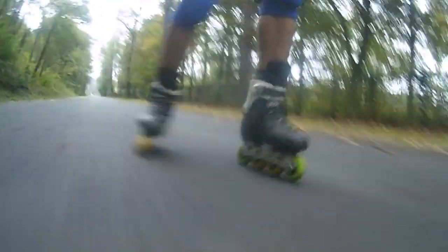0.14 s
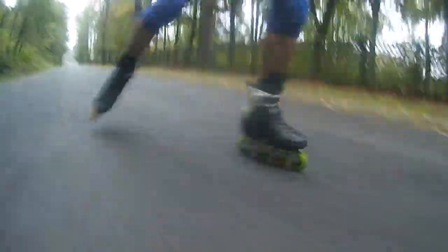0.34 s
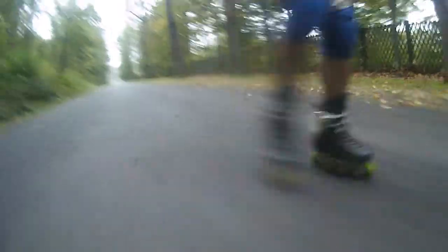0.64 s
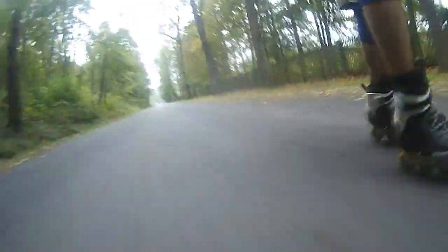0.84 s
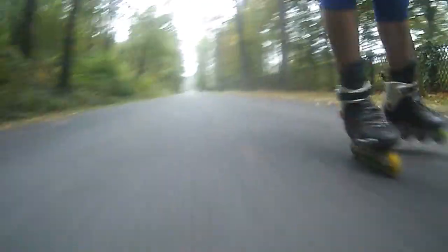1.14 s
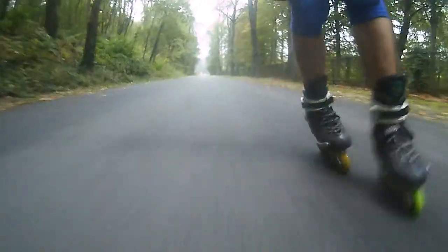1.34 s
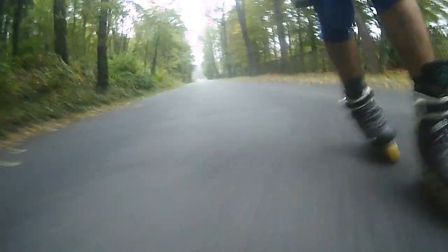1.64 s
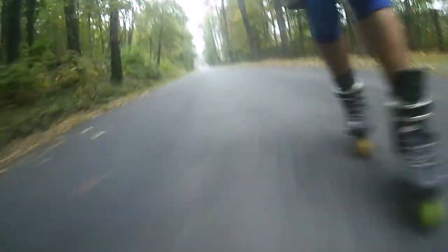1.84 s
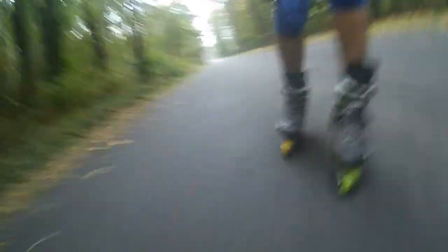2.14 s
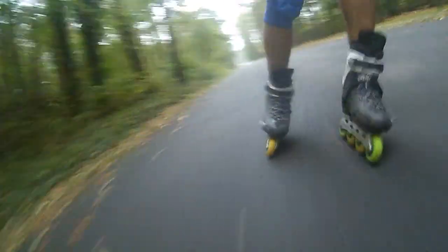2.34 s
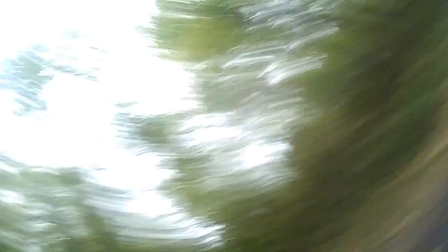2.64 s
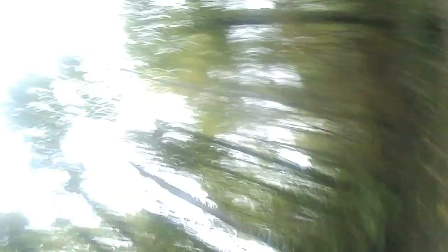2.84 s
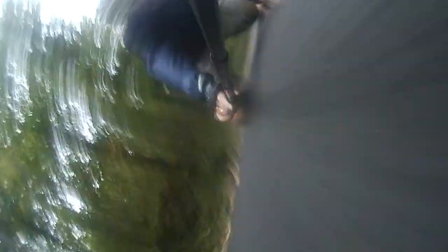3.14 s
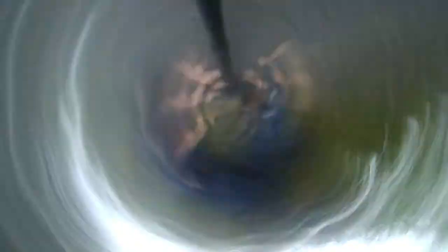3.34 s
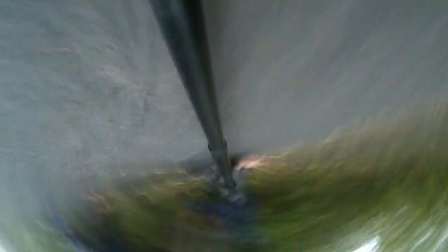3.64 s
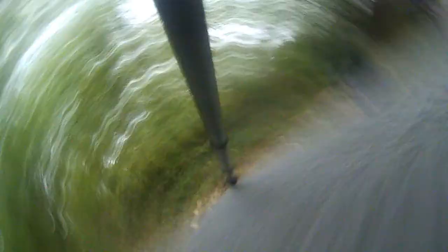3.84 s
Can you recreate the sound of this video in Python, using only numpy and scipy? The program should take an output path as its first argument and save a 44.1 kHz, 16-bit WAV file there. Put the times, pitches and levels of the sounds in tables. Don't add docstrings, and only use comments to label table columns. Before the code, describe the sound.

Heard from inside a sealed camera case on a pole: soft grainy skate rolling over faint hiss, a sharp tick midway, then a sudden burst of cracks, deep thuds and plastic chatter against asphalt, cut off abruptly.

```python
import sys
import numpy as np
from scipy import signal
from scipy.fft import rfft, irfft, next_fast_len
from scipy.io import wavfile
from scipy.ndimage import uniform_filter1d, map_coordinates

SR = 44100
rng = np.random.default_rng(int(sys.argv[2]) if len(sys.argv) > 2 else 0)


def unload_audio(sound):
    columns = np.transpose(np.atleast_2d(sound))
    steps = np.round(np.clip(columns, -1, 1) * 32767)
    wavfile.write(sys.argv[1], SR, steps.astype(np.int16))


def gain_from_db(level_db):
    decades = np.asarray(level_db, float) / 20
    return 10 ** decades


N = 176400


def unit(x):
    return x / np.sqrt(np.mean(x ** 2) + 1e-20)


def curve(rows):
    return np.interp(np.arange(N) / SR, *np.transpose(rows))


def wobble(rate_hz):
    knots = rng.standard_normal(int(N * rate_hz / SR) + 4)
    return map_coordinates(knots, [np.arange(N) * rate_hz / SR])


def filtered(x, response):
    m = next_fast_len(N + SR // 2)
    return irfft(rfft(x, m) * response(np.fft.rfftfreq(m, 1 / SR)), m)[:N]


def noise(response):
    return unit(filtered(rng.standard_normal(N), response))


def colour(points):
    hz_points, db = np.transpose(points)
    return lambda hz: gain_from_db(np.interp(np.log(hz + 1), np.log(hz_points + 1), db))


def resonance(f, hz, width_hz):
    return 1j * f * width_hz / (hz * hz - f * f + 1j * f * width_hz)


def add(track, time_s, x):
    i = round(time_s * SR)
    track[i:i + len(x)] += x[:max(len(track) - i, 0)]


def push(contact_s):
    u = np.arange(int(contact_s * 8 * SR) + 4) / (contact_s * SR / 2 + 1)
    return u * np.exp(1 - u)


def through(force, body):
    wall_hz = 3920

    def response(f):
        wall = 1 / (1 + 1.1j * f / wall_hz - (f / wall_hz) ** 2) ** 4
        return wall * sum(gain_from_db(db) * resonance(f, hz, width_hz) for hz, width_hz, db in body)

    return filtered(force, response)


# (frequency [Hz], width [Hz], level [dB])
HOUSING_MODES = [(103.2, 45.6, 2.5), (226, 106, -6.5), (495, 570, -8), (762, 14, -18), (1079, 267, -0.5),
                 (1300, 220, -44), (1690, 71, -11.5), (2380, 160, -12), (2730, 60, -16), (3674, 330, -10.5),
                 (4300, 290, -26), (5530, 2600, -12.5)]


def housing(force):
    return through(force, HOUSING_MODES)


# (time [s], level [dB])
ROLLING = [(0.0, -64.5), (0.19, -69), (0.41, -68.5), (0.63, -64), (.9, -66), (1.16, -64.5), (1.35, -66),
           (1.57, -68.5), (2.2, -65.5), (2.44, -64), (2.7, -65), (3.15, -67), (3.44, -62.5), (3.63, -55.5),
           (3.72, -60), (4.0, -56.5)]
# (frequency [Hz], level [dB per Hz])
ROAD_GRAIN = [(60, -59.5), (100, 11), (200, 4.5), (600, 11.5), (1200, 6), (2500, -6.5), (4000, -2),
              (7000, 10)]


def wheels():
    grains_per_s, grain_db = 1500, 1.5
    bearing_hz, bearing_width_hz, bearing_db = 2960, 330, -17
    struck = rng.random(N) < grains_per_s / SR
    size = gain_from_db(grain_db * (4.5 + rng.exponential(size=N)))
    grains = rng.standard_normal(N) * (1 + struck * size)
    hum = unit(housing(filtered(grains, colour(ROAD_GRAIN))))
    bearings = unit(filtered(grains[::-1], lambda f: resonance(f, bearing_hz, bearing_width_hz) ** 2))
    flutter_db = 0.8 * (wobble(5.46) + wobble(25.35))
    return gain_from_db(curve(ROLLING) + 0.5 + flutter_db) * (hum + gain_from_db(bearing_db) * bearings)


UPPER_HZ = 108.6


def swing(f):
    return 1 / (1 + 1j * f * 42.2 / 46 ** 2 - (f / 46) ** 2) ** 2


def judder(f):
    return resonance(f, UPPER_HZ, 60)


# (time [s], level [dB])
SWAY_LEVEL = [(0.0, -53), (0.11, -51.5), (0.14, -61), (0.36, -44), (0.45, -59.5), (0.51, -50),
              (0.97, -52.5), (1.74, -53), (1.79, -47), (1.82, -61.5), (1.97, -48), (2.04, -54), (3.39, -55),
              (3.45, -49)]


def sway():
    lumps_db, judder_db = 3.5, -17.5
    sway_db = curve(SWAY_LEVEL)
    slow = noise(swing)
    power = np.abs(uniform_filter1d(slow * slow, size=3500))
    steadied = slow / (power + 0.1) ** 0.35
    out = gain_from_db(sway_db + lumps_db * wobble(6.91)) * steadied
    return out + gain_from_db(sway_db.mean() + judder_db + 1.1 * wobble(8.8)) * noise(judder)


# (frequency [Hz], level [dB per Hz])
HISS_SPECTRUM = [(300, -28), (600, -0.5), (6000, 7), (13500, 5.5), (15000, 5), (15700, -6)]


def hiss():
    return gain_from_db(-79) * noise(colour(HISS_SPECTRUM))


# (frequency [Hz], level [dB rms])
WHINE_TONES = [(1403, -88), (1428, -87), (2831, -90), (4233, -99), (4258, -98), (5661, -104), (8492, -107),
               (9895, -107), (9920, -107), (11322, -106), (15019, -109)]


def whine():
    t = np.arange(N) / SR
    return sum(np.sqrt(2) * gain_from_db(db) * np.sin(2 * np.pi * hz * t) for hz, db in WHINE_TONES)


# (time [s], peak level [dB], pitch [Hz], T60 [s])
LOOSE_PARTS = [(0.075, -50.5, 2000, 0.018), (0.075, -57, 3500, 0.019), (0.077, -56, 5400, .006),
               (.0801, -47, 4000, 0.0051), (.0803, -50, 2400, 0.0081), (0.08, -49, 6460, 0.0033),
               (.0913, -62, 5000, .004), (0.49, -61, 3000, 0.013), (1.413, -62, 3770, 0.02),
               (1.4175, -59, 3600, .008), (1.4203, -41, 1850, 0.01), (1.4215, -45, 3800, 0.0065),
               (1.1, -52, 1900, .008), (1.4202, -43.5, 4600, 0.007), (1.4212, -41.5, 5350, 0.0076),
               (1.42, -45.5, 6000, 0.0055), (1.4235, -61, 4000, 0.013), (1.4245, -60, 5200, .01),
               (1.5708, -54, 3700, 0.0071), (1.5716, -56, 2600, 0.0076), (1.5708, -59, 6300, .004),
               (1.582, -61, 2800, .01), (1.4205, -53, 9000, 0.004), (3.607, -61, 7900, 0.006),
               (3.581, -56, 7200, 0.0041), (3.901, -55.5, 3770, .03), (3.6225, -49.5, 7500, 0.0045),
               (3.6232, -40, 3900, 0.0049), (3.63, -58, 7540, .008), (3.3, -46, 3600, 0.0055),
               (3.6365, -41.5, 2880, 0.0082), (3.659, -61, 2900, .01), (3.65, -56.5, 2950, 0.0067),
               (3.7056, -45.5, 2070, 0.011), (3.7058, -55, 6800, .004), (3.7058, -54.5, 11000, .003),
               (3.706, -44.5, 4300, 0.0068), (3.7059, -53, 8300, 0.0045), (3.7255, -40, 3900, 0.0084),
               (3.7258, -52, 5400, 0.008), (3.7257, -56, 5400, 0.007), (3.8135, -56, 4800, 0.0084),
               (3.8138, -58, 7200, .005), (3.822, -61, 7400, .012), (3.853, -58, 3100, .012)]


def clicks():
    rise_s, roughness = 0.00025, 0.4
    out, t = np.zeros(N), np.arange(SR // 20) / SR
    for time_s, db, hz, t60_s in LOOSE_PARTS:
        smooth = uniform_filter1d(rng.standard_normal(len(t)), size=9)
        rough = 1 + roughness * unit(uniform_filter1d(smooth, size=9))
        envelope = gain_from_db(db - 60 * t / t60_s) * (1 - np.exp(-t / rise_s))
        add(out, time_s, envelope * rough * np.sin(2 * np.pi * hz * t))
    return out


# (time [s], peak level [dB], contact time [s], direction [+1 or -1])
CASE_KNOCKS = [(0.0796, -46.5, 0.00036, 1), (0.0907, -48.5, 0.00015, 1), (0.409, -55, 0.00052, 1),
               (0.479, -55, 0.00022, 1), (1.4202, -47.5, 0.00065, -1), (1.481, -54.5, 0.00038, -1),
               (1.5706, -53.5, 0.0002, 1), (1.5815, -52.5, 0.00051, 1), (3.445, -54, 0.00032, 1),
               (3.464, -57, 0.00027, 1), (3.514, -47, 0.0011, 1), (3.534, -32.5, 0.0013, 1),
               (3.5802, -30, 0.00075, 1), (3.581, -18, 0.00092, -1), (3.582, -31.5, 0.0013, 1),
               (3.6363, -37.5, 0.00038, -1), (3.638, -33, 0.004, -1), (3.66, -32, 0.0083, 1),
               (3.745, -45, 0.00033, -1), (3.776, -37.5, 0.0013, 1), (3.7781, -43, .001, 1),
               (3.8176, -40, 0.00027, -1), (3.8255, -29.5, 0.0015, 1), (3.901, -48, 0.00016, 1),
               (3.929, -40, 0.00064, 1), (3.969, -35.5, 0.00087, 1)]
# (frequency [Hz], width [Hz], level [dB])
SHELL_MODES = [(506, 80, -1), (630, 120, -11), (765, 40, 3), (1100, 70, 2), (1180, 90, -1),
               (1460, 120, -13), (1600, 100, -17), (1890, 100, -14), (2490, 130, -15), (2960, 300, -13),
               (3770, 260, -11)]


def knocks():
    direct_hz = 2500
    force = np.zeros(N)
    for time_s, db, contact_s, direction in CASE_KNOCKS:
        add(force, time_s, direction * gain_from_db(db) * push(contact_s))
    direct = filtered(force, lambda f: 1 / (1 + 1j * f / direct_hz) ** 2)
    return 2.0 * housing(force) + 0.35 * direct + 2.0 * through(force, SHELL_MODES)


# (time [s], level [dB])
DRAG_LEVEL = [(3.4, -70), (3.5, -48), (3.6, -44), (3.7, -42), (3.8, -44), (4, -46)]


def drag():
    return gain_from_db(curve(DRAG_LEVEL)) * (noise(swing) + 0.52 * noise(lambda f: judder(f) ** 2))


# (time [s], level [dB], direction [+1 or -1])
POLE_BLOWS = [(3.504, -20.5, 1), (3.525, -29.5, 1), (3.577, -19.5, 1), (3.623, -15.5, 1),
              (3.633, -23.5, -1), (3.705, -22, 1), (3.734, -22, 1), (3.761, -23, 1), (3.791, -19.5, -1),
              (3.817, -7, -1), (3.89, -18, 1), (3.909, -13.5, -1), (3.952, -17, 1), (3.974, -17.5, 1)]


def thuds():
    pole_hz, pole_t60_s, rise_s = 36.2, 0.13, 0.0062
    upper_db, upper_t60_s = -27, 0.19
    out, t = np.zeros(N), np.arange(SR // 2) / SR
    ring = gain_from_db(-60 * t / pole_t60_s) * np.sin(2 * np.pi * pole_hz * t)
    ring += gain_from_db(upper_db - 60 * t / upper_t60_s) * np.sin(2 * np.pi * UPPER_HZ * t)
    for time_s, db, direction in POLE_BLOWS:
        add(out, time_s, direction * gain_from_db(db + 0.5) * (1 - np.exp(-t / rise_s)) * ring)
    return out


def pole():
    low_cut_hz = 7.1
    return filtered(sway() + drag() + thuds(), lambda f: 1j * f / (low_cut_hz + 1j * f))


def slips(time_s, length_s, rate, contact_s, jitter, scatter_db, crunch):
    edge_s, crunch_s = 0.004, 0.0025
    chance = rng.standard_normal((60, 2))
    force, t = np.zeros(N), np.arange(SR // 100) / SR
    at = np.cumsum(np.exp(jitter * chance[:, 0])) / rate - 1 / rate
    fade = np.clip(np.minimum(at + edge_s, length_s - at) / edge_s, 0, 1)
    step = np.diff(push(contact_s))
    for start, size in zip(at, fade * gain_from_db(scatter_db * chance[:, 1])):
        add(force, time_s + start, size * step)
        burst = np.exp(-t / crunch_s) * rng.standard_normal(len(t))
        add(force, time_s + start, size * crunch * step.max() * burst)
    return force


def at_level(x, db, length_s):
    return gain_from_db(db) * np.sqrt(length_s * SR / N) * unit(x)


# (time [s], length [s], level [dB rms], slip rate [per s], contact time [s])
CASE_SCRAPES = [(3.521, 0.052, -65, 920, 0.00035), (3.57, 0.014, -49.5, 950, 0.00047),
                (3.577, 0.0066, -47.5, 860, 0.00035), (3.606, 0.016, -39, 1170, 0.0002),
                (3.638, 0.027, -55.5, 600, 0.0011), (3.713, 0.044, -57.5, 900, 0.00049),
                (3.754, .015, -50.5, 490, 0.00017), (3.781, 0.055, -57, 1080, 0.0011),
                (3.813, 0.018, -61, 1100, 0.00031), (3.852, 0.012, -59.5, 760, 0.00032),
                (3.9, 0.029, -49.5, 1140, 0.00076), (3.936, 0.021, -51, 770, 0.00061),
                (3.973, 0.018, -62, 950, 0.00045)]


def scrapes():
    out = np.zeros(N)
    for time_s, length_s, db, rate, contact_s in CASE_SCRAPES:
        force = slips(time_s, length_s, rate, contact_s, jitter=0.52, scatter_db=3, crunch=0.27)
        out += at_level(housing(force), db, length_s)
    return out


def bending(x):
    delay_s = 0.002
    return filtered(x, lambda f: np.exp(-4j * np.pi * delay_s * (np.sqrt(1000 * f) - f / 2)))


# (time [s], length [s], level [dB rms], slip rate [per s], contact time [s])
SHELL_BUZZES = [
    (3.59, 0.018, -33, 272, 0.0002),
    (3.605, 0.021, -30, 512, 0.0016),
    (3.745, .01, -43, 900, .0009),
    (3.8175, .006, -41, 900, .0005),
    (3.823, .007, -34, 640, .0018),
    (3.953, 0.02, -50, 235, 0.00012),
]


def buzzes():
    out = np.zeros(N)
    for time_s, length_s, db, rate, contact_s in SHELL_BUZZES:
        force = slips(time_s, length_s, rate, contact_s, jitter=0.08, scatter_db=1.5, crunch=0.08)
        out += at_level(bending(through(force, SHELL_MODES)), db, length_s)
    return out


# (time [s], level [dB])
GRIT_LEVEL = [(3.86, -140), (3.872, -76), (3.884, -71), (3.888, -77), (3.907, -67), (3.925, -74),
              (3.945, -71), (3.965, -72), (3.985, -71), (4, -74)]


def grit():
    grains_per_s, size_db = 3500, 3
    struck = rng.random(N) < grains_per_s / SR
    size = gain_from_db(size_db * rng.exponential(size=N).clip(0, 2))
    grains = rng.standard_normal(N) * (0.4 + struck * size)
    slide = filtered(grains, lambda f: resonance(f, 5500, 1300) ** 2 + 0.33 * resonance(f, 6700, 4000) ** 2)
    return gain_from_db(curve(GRIT_LEVEL) + 2.4 * wobble(90)) * unit(slide)


def scene():
    end_fade_s = 0.004
    fade = np.clip((N - np.arange(N)) / (end_fade_s * SR), 0, 1)
    body = wheels() + pole() + clicks() + knocks() + scrapes() + buzzes() + grit()
    return (fade * body)[None]


def low_pass(x):
    return signal.sosfilt(signal.butter(12, 15710, fs=SR, output="sos"), x)


def record(dry):
    return low_pass(dry + hiss() + whine())


dry = scene()
out = record(dry)
unload_audio(out)
```